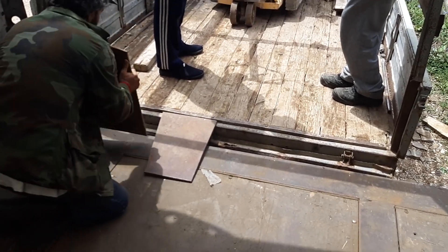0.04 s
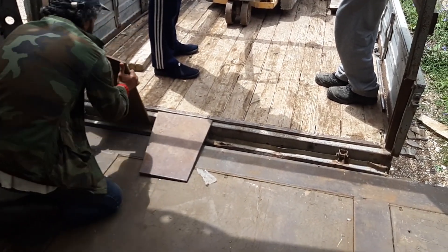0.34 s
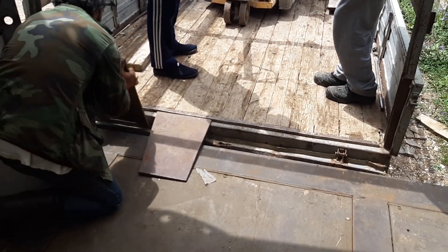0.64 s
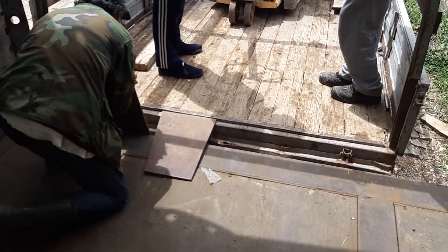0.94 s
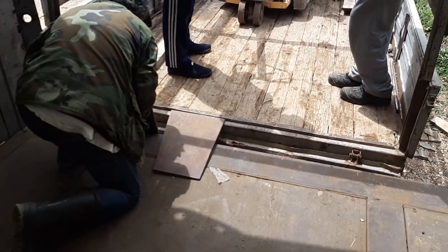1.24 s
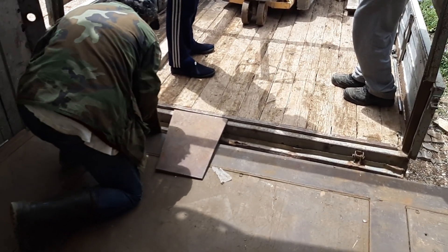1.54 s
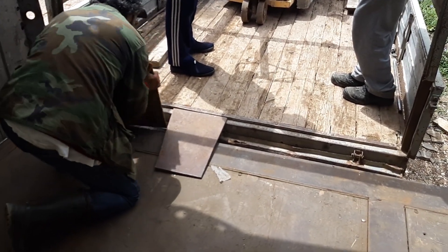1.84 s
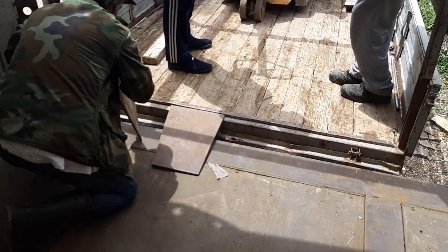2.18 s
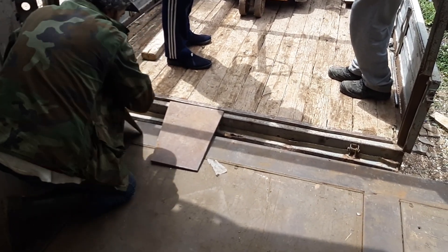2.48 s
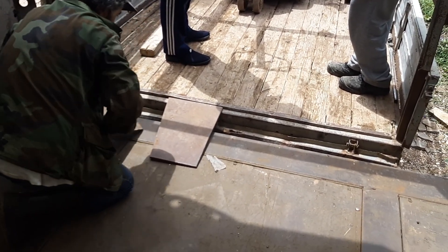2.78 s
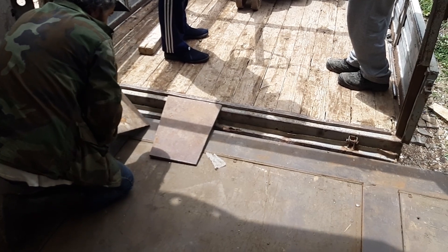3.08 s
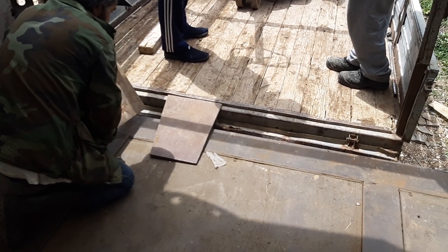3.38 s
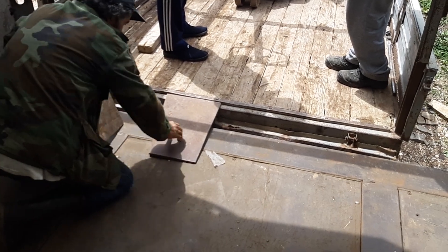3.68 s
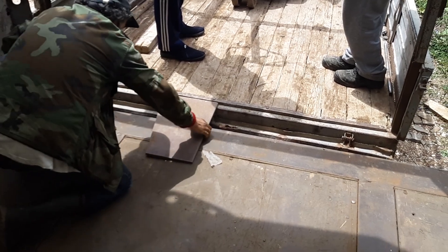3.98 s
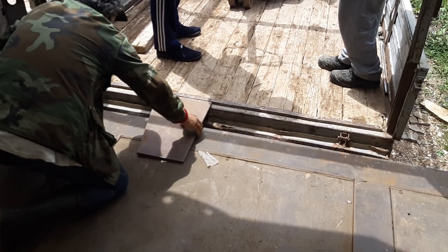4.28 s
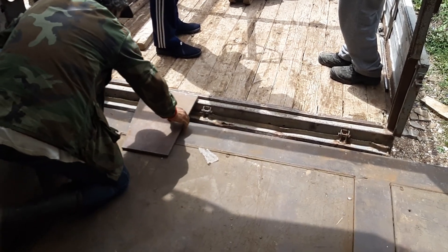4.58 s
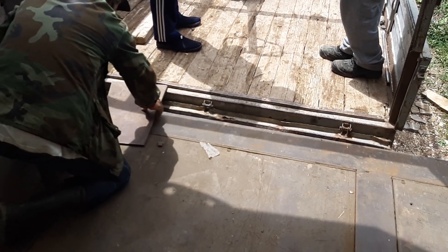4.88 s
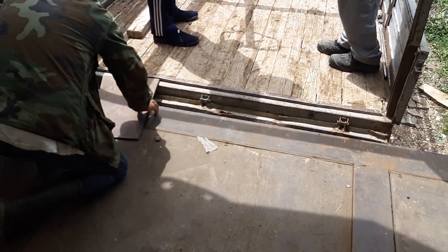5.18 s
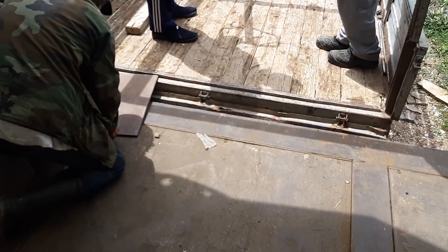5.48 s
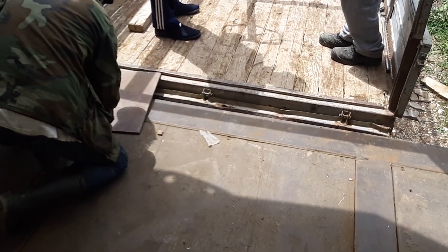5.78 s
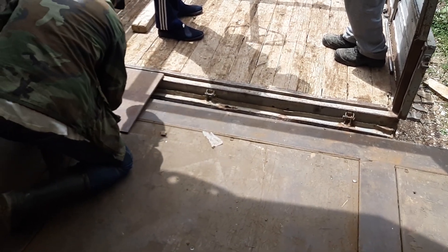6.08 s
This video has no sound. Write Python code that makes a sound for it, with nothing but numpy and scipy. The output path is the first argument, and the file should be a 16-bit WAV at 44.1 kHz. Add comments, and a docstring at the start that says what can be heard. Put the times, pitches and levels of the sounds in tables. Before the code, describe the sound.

Short gritty scrapes and echoing clanks of flat steel plates being shifted around inside a metal cargo box.

```python
"""A kneeling man works a flat steel plate along the floor of a steel cargo box, in still outdoor air.
First come scrapes and knocks: the edge grinds over grit, and each blow rings plate and floor and
echoes in the box. Near 1.8 s and 3 s the edge sticks and slips, so the floor groans. He sets the plate
down and drags a second one over the sill, with a run of ringing clangs from 3.6 to 4 s.
More scrapes and knocks follow, the last just after 6 s."""
import sys
import numpy as np
from scipy import signal
from scipy.fft import rfft, irfft, next_fast_len
from scipy.io import wavfile

SR = 44100
rng = np.random.default_rng(int(sys.argv[2]) if len(sys.argv) > 2 else 0)


def int16_out(signal):
    """Quantize to a 16-bit WAV file."""
    q = np.round(np.clip(np.atleast_2d(signal).T, -1, 1) * 32767)
    wavfile.write(sys.argv[1], SR, q.astype(np.int16))


N = 270316
RING_S, ATTACK_S = 1.2, 0.033   # length of one ring, and the opening part that sets its level

# Steel hitting steel. Thud and clang are counted from the strength; more dullness means less treble.
# (time [s], relative strength [dB], thud [dB], clang [dB], dullness [dB per octave], plate ring [dB],
#  clatter fade time [s])
HITS = [(0.566, -27, -24, 2.5, 11.5, -2.5, 0.68), (0.64, -28, -11.5, -12, 6.5, -13, 0.11),
        (0.745, -18.5, -16, -2, 6.5, -18.5, 0.63), (0.767, -26.5, 6, 2.5, 1.5, -6, 0.32),
        (0.984, -12, -18.5, 0, 12, 0.5, 0.54), (1.199, -26.5, -23, -22, 2.5, -6, 0.21),
        (1.25, -24.5, -42, -4.5, 9, -8, 0.15), (1.853, -45.5, -27, 4.5, 9.5, 6, 0.52),
        (2.201, -30.5, -9, 9, 8.5, -7.5, .12), (2.21, -17.5, -4.5, -5, 7.5, -12, 0.32),
        (2.295, -31, 1.5, -4, 7.5, -15, 0.34), (2.797, -44.5, -10, 0, 4, 1, 0.49),
        (3.113, -40, -15, -9, 6.5, -7, 0.56), (3.135, -47.5, -15.5, 8, 10, 11, 0.44),
        (3.579, -18.5, -3, -4, 4.5, 0.5, 0.72), (3.677, -17.5, -5, -1, 4.5, 1.5, 0.74),
        (3.733, -24, 6, 4, 9, 5, 1), (3.836, -14.5, -7, 0.5, 3, 12, 0.71),
        (3.872, -15, -16.5, 4.5, 6.5, 11.5, 0.81), (3.945, -22.5, -10, 2.5, 4.5, 27.5, 0.75),
        (3.972, -14, -25.5, -3.5, 8, -6.5, .31), (4.471, -47, 4, 2.5, -2, -8, 0.3),
        (4.496, -24, -6.5, -4, 3.5, -10.5, 0.27), (4.653, -40.5, 0, -26, 25, 19, .19),
        (4.798, -29.5, -9.5, 3, 5.5, -9, 0.23), (4.867, -31, -12.5, -5.5, 1.5, -21, 0.35),
        (5.51, -30.5, -11, -13, 5, 0, 0.23), (5.535, -37, -15, -2, 3, 1, .55),
        (6.021, -16.5, -14.5, 1.5, 7, 3, 0.21), (6.087, -37, -12, 14, 12, 16, 0.16)]
# When the plate lying over the sill rings rather than the held one: (start [s], end [s])
SILL_TIMES = [(0.7, 1.4), (3.5, 5.0)]
def blows(steel, swell_s=0.0033, crack_db=-5.5, full_ring_db=14.5, edge_octaves=1.22, grit_octaves=3.03):
    """Each blow swells as the edge settles, cracks and dies away; a blunter blow has less treble."""
    out = np.zeros((2, N))
    t = np.arange(round(RING_S * SR)) / SR
    attack = (1 - np.exp(-t / swell_s)) * (1 + from_db(crack_db) * fade(t, 0.058))
    for start, strength_db, thud_db, clang_db, dullness, ring_db, t60 in HITS:
        on_sill = any(begin < start < end for begin, end in SILL_TIMES)
        free_db = min(ring_db - full_ring_db, 0)   # a freer plate keeps more of its ring
        bands = struck_steel(steel, sill_share=0.97 if on_sill else 0.05, clatter_t60=t60,
                             plate_db=ring_db, floor_db=-6.5, damping_t60=1.84 * t60, free_db=free_db)
        edge_db = clang_db - dullness * edge_octaves
        grit_db = clang_db - dullness * grit_octaves
        for db, band in zip([thud_db, 0, clang_db, edge_db, grit_db], bands):
            hit = band * attack
            add(out, hit * from_db(strength_db + db) / attack_rms(hit), start)
    return out


# The notes (modes) of the plate over the sill, the plate in his hands and the steel floor.
# Each table: (pitch [Hz], relative level [dB], fade time [s])
SILL_PLATE_NOTES = [(1120, -15, 0.5), (1238, -12, 0.65), (1394, -3, 0.85), (1540, -4, 0.65),
                    (1701, -7, 0.85), (1890, 2, 1.0), (2056, 0, 0.85), (2094, -15, 0.78), (2347, 1, 0.48),
                    (2503, -10, 0.72), (2751, -8, 0.55), (2842, -3, 0.72), (2891, -20, 0.68),
                    (2977, -22, 0.67), (3607, -7, 0.55), (3682, -7, 0.68), (4506, -23, 0.56),
                    (4683, -14, 0.55), (5006, -28, 0.53), (5286, -27, 0.52), (5367, -28, 0.51),
                    (5809, -13, 0.48), (6158, -24, 0.48), (6347, -27, 0.48), (6864, -33, 0.46),
                    (7041, -32, 0.45), (7095, -35, 0.45), (8285, -36, 0.42), (11084, -36, 0.37),
                    (11536, -40, 0.36)]
HELD_PLATE_NOTES = [(1126, -3, .35), (1238, -8, 1.1), (1292, -3, .3), (1542, -7, 1.0), (1884, -1, .85),
                    (1912, 1, .25), (2030, -3, .3), (2363, -6, .6), (2530, -5, .35), (2885, -6, .8),
                    (2977, -12, .8), (3836, -2, .6), (4690, -8, .7), (5006, -18, .5), (5785, -16, .45),
                    (6352, -17, .35), (6589, -13, .35)]
FLOOR_NOTES = [(109.5, -4.5, 0.55), (147.8, 4.5, 0.79), (250.7, -4, 0.31), (279.8, 7.5, 0.36),
               (339.8, 6, 0.74), (437.7, 3, 0.72), (494.2, 0.5, 0.42), (653, -19, 0.35), (616, 7, 0.78),
               (866, 2, 0.5), (904, 0.5, 1)]
def steel_notes():
    """Bending steel rings at its own notes: yield each part's pitches and fading sine and cosine waves."""
    t = np.arange(round(RING_S * SR)) / SR
    for notes in (SILL_PLATE_NOTES, HELD_PLATE_NOTES, overtones(), FLOOR_NOTES):
        hz, db, t60 = np.transpose(notes)
        angle = 2 * np.pi * hz[:, None] * t
        decay = from_db(db)[:, None] * fade(t, t60[:, None])
        yield hz, np.vstack([np.sin(angle) * decay, np.cos(angle) * decay]).astype(np.float32)


def ringing(part, spread_db=1.65):
    """Steel struck at a random spot: each note gets its own strength, and its own phase at each ear."""
    hz, waves = part
    strength = from_db(spread_db * rng.standard_normal(len(hz)))
    ear_gap = np.arccos(at_hz(EAR_LIKENESS, hz)) * (-1) ** np.arange(len(hz))
    phase = rng.uniform(0, 2 * np.pi, len(hz)) + ear_gap * [[0], [1]]
    ring = np.hstack([strength * np.cos(phase), strength * np.sin(phase)]).astype(np.float32) @ waves
    return ring / attack_rms(ring)


# The many weak notes of floor and walls, blurred into noise: (frequency [Hz], relative level [dB])
CLATTER_TONE = [(26, -58.5), (45, -20), (112, -11.5), (139, -8), (187, -7), (391, -5.5), (539, -7),
                (1020, -9), (1300, -11), (1480, -8), (5040, -17), (5430, -18.5), (7650, -29.5),
                (9550, -35.5), (16000, -45.5)]
# The echo of the box, one row for each band from thud to grit: (relative level [dB], fade time [s])
BOX_ECHO = [(-15.5, 0.93), (-13.5, 0.87), (-3, 0.65), (-10, 0.84), (-14.5, 0.91)]
def struck_steel(steel, sill_share, clatter_t60, plate_db, floor_db, damping_t60, free_db):
    """One touch gives a quick clatter, the echo of the box and clear notes, split into five bands."""
    t = np.arange(round(RING_S * SR)) / SR
    clatter = stereo_noise(CLATTER_TONE, len(t))
    sill, held, high, floor = (ringing(part) for part in steel)
    plates = np.sqrt(sill_share) * sill + np.sqrt(1 - sill_share) * held + from_db(-19) * high
    # Hands and floor soak up the ring, except for the share that stays free.
    damping = np.hypot(fade(t, damping_t60), from_db(free_db))
    notes = (from_db(plate_db) * plates + from_db(floor_db) * floor) * damping
    bands = []
    for index, (echo_db, echo_t60) in enumerate(BOX_ECHO):
        decay = np.hypot(fade(t, clatter_t60), from_db(echo_db) * fade(t, echo_t60))
        bands.append(one_band(clatter * decay + notes, index))
    return bands


def overtones(count=80, t60_at_3khz=0.81):
    """A plate's high notes are about evenly spaced, and the higher ones die sooner."""
    hz = np.linspace(2600, 15000, count) + rng.uniform(-70, 70, count)
    db = at_hz(CLATTER_TONE, hz) + rng.normal(0, 1, count)
    return np.column_stack([hz, db, t60_at_3khz * np.sqrt(3000 / hz)])


# Pushes of the edge along the floor:
# (start [s], length [s], relative level [dB], growth over the push [dB], bite into grit [dB])
PUSHES = [(0.286, 0.048, -74, -3, 19), (0.448, .09, -68.5, 0, 11), (0.605, 0.089, -24, -9, -6),
          (0.757, 0.059, -24.5, -1, 8), (0.87, 0.11, -32, -6, 0), (1.191, 0.078, -26.5, -0.5, -8),
          (1.3, .07, -43, 4, -13), (1.678, .15, -51, 2, -1), (1.824, 0.042, -46, 9, 2.5),
          (1.924, .11, -61, 4.5, 9.5), (2.269, 0.067, -29.5, -5, -5.5), (2.36, 0.059, -38, -2, -8),
          (2.775, .175, -38, 4, -0.5), (2.965, 0.18, -48, 9.5, 0), (3.44, .13, -66, 0.5, 10.5),
          (4.257, 0.21, -43, 9, 4.5), (4.556, 0.22, -39.5, 15, 3), (4.803, .04, -33, 2, 2),
          (4.897, 0.078, -35, -5, -13), (5.004, 0.071, -51, 0.5, -1), (5.436, 0.059, -41.5, 12.5, 0.5),
          (5.544, 0.14, -42, -10, -9.5), (5.697, .12, -54.5, 10, 1.5), (5.824, 0.18, -33, 10.5, 1.5),
          (6.064, .07, -37, 3, 0)]
# A scrape's tone, one row for each band: (relative level [dB], gain from bite [dB per dB])
SCRAPE_TONE = [(-8.5, 0), (-0.5, 0), (-8.5, 0.9), (-7.5, 1), (-16.5, 1.37)]
def scraping(steel):
    """Tiny slips shake the steel. Pressed down, the plate hardly rings; more bite gives more treble."""
    pushes = np.array([push(*shape) for *shape, _ in PUSHES])
    bite_db = np.array(PUSHES)[:, -1]
    force = slips()
    bands = struck_steel(steel, sill_share=0.45, clatter_t60=0.15,
                         plate_db=-8, floor_db=-8, damping_t60=0.13, free_db=-17)
    out = np.zeros((2, N))
    for (db, bite_gain), band in zip(SCRAPE_TONE, bands):
        pressure = from_db(db + bite_gain * bite_db) @ pushes
        one_slip = band / np.sqrt(np.sum(band ** 2) / 2)
        out += signal.fftconvolve((force * pressure)[None], one_slip, axes=1)[:, :N]
    return out


def slips(per_s=1300, spread_db=3.5, rough_db=2.5, rough_hz=70.96):
    """The edge slips over rust and grit in tiny kicks of uneven size, stronger in bunches."""
    sizes = from_db(spread_db * np.minimum(rng.exponential(1, N), 4)) * rng.choice([-1, 1], N)
    slipping = rng.random(N) < per_s / SR
    kicks = sizes * slipping * from_db(rough_db * wander(rough_hz))
    return kicks / rms(kicks)


def push(start, length, level_db, growth_db, grip_s=0.016, let_go_s=0.025):
    """The loudness of one push: the edge grips, the pressure grows or eases, the edge lets go."""
    t = np.arange(N) / SR - start
    contact = np.clip(np.minimum(t / grip_s, 1 + (length - t) / let_go_s), 0, 1)
    touching = contact > 0
    progress = np.minimum(t[touching] / length, 1)
    contact[touching] *= from_db(level_db + growth_db * (progress - 0.5))
    return contact


# Groans from the dragged edge: (start [s], length [s], level [dB], growth [dB], pitch [Hz])
GROANS = [(1.739, .06, -48, 5, 380), (1.83, 0.027, -41, 14, 355.4), (2.798, 0.15, -37.5, 7, 322),
          (2.972, 0.17, -39, -2, 337.6), (3.112, 0.054, -31, -14, 339)]
def judder(pitch_waver=0.038, rough_db=-3.5):
    """The edge sticks and slips at a nearly steady rate, and the floor groans."""
    uneven_time = (np.arange(N) + np.cumsum(pitch_waver * wander(hz=79))) / SR
    groan = sum(push(*shape) * np.sin(2 * np.pi * hz * uneven_time) for *shape, hz in GROANS)
    return groan * from_db(rough_db * wander(hz=39.55))


# The tone of still outdoor air: (frequency [Hz], relative level [dB])
AIR_TONE = [(18, -31), (30, -5), (252, -15.5), (740, -9), (1320, -13), (2410, -15), (2610, -18),
            (2830, -18.5), (3400, -13), (9970, -20.5), (16000, -38.5)]
def outdoor_air(level_db=-68.5):
    """The air is a faint, steady hush behind everything."""
    return from_db(level_db) * stereo_noise(AIR_TONE, N)


# How alike the two ears hear a sound: (frequency [Hz], likeness [1 = the same, 0 = unrelated])
EAR_LIKENESS = [(60, 1), (150, 0.98), (350, 0.96), (700, 0.46), (1400, -0.14), (3000, -0.11), (12000, 0.08)]
def stereo_noise(tone, size):
    """Noise with the given tone and an average level of 1, alike at both ears only in the bass."""
    padded = next_fast_len(size)
    hz = np.fft.rfftfreq(padded, 1 / SR)
    mid, side = rfft(rng.standard_normal((2, padded)))
    alike = at_hz(EAR_LIKENESS, hz)
    ears = np.sqrt(1 + alike) * mid + np.sqrt(1 - alike) * side * [[1], [-1]]
    noise = irfft(ears * from_db(at_hz(tone, hz)), padded)[:, :size]
    return noise / rms(noise)


# The five bands of the steel's sound, named thud, body, clang, edge and grit: (low [Hz], high [Hz])
BANDS = [(45, 250), (250, 1000), (1000, 2620), (2620, 7000), (7000, 15900)]
# Which way each band leans: (left level minus right level [dB])
LEAN_DB = [0, -0.5, -1, -0.5, -1.3]
def one_band(sound, index):
    """Keep one band of a stereo sound and set its left-right balance."""
    band = signal.sosfilt(signal.butter(4, BANDS[index], "band", fs=SR, output="sos"), sound)
    return band * from_db(np.array([[1], [-1]]) * LEAN_DB[index] / 2)


def from_db(db):
    """Turn decibels into a number to multiply by."""
    return 10 ** (np.asarray(db) / 20)


def rms(sound):
    """The average level of a sound (root mean square)."""
    return np.sqrt(np.mean(sound ** 2) + 1e-20)


def attack_rms(sound):
    """The average level of a sound's opening moment."""
    return rms(sound[:, :round(ATTACK_S * SR)])


def fade(t, t60):
    """Die away by 60 dB in t60 seconds, the fade time."""
    return np.exp(-np.log(1000) * t / t60)


def at_hz(points, hz):
    """Read between a table's rows, giving every octave the same width."""
    row_hz, value = np.transpose(points)
    return np.interp(np.log(hz + 0.0012), np.log(row_hz), value)


def wander(hz):
    """A random drift, about 1 in size, that heads for a new value hz times a second."""
    targets = rng.standard_normal(4096)
    return np.interp(np.arange(N) * hz / SR, np.arange(len(targets)), targets) / np.sqrt(2 / 3)


def add(out, sound, start_s):
    """Mix a sound in at its start time."""
    i = round(start_s * SR)
    out[:, i:i + sound.shape[1]] += sound[:, :N - i]


def scene():
    """Blows, scraping and judder over quiet air."""
    steel = list(steel_notes())
    return from_db(-2) * blows(steel) + scraping(steel) + judder() + outdoor_air()


def record(dry, dip_hz=7900, dip_depth=0.5, cutoff_hz=15900):
    """The microphone softens the sound near 8 kHz, clips the peaks and cuts the highest treble."""
    dip_b, dip_a = signal.iirpeak(dip_hz, Q=4, fs=SR)
    softened = dry - dip_depth * signal.lfilter(dip_b, dip_a, dry)
    treble_cut = signal.ellip(10, 0.1, 80, cutoff_hz, fs=SR, output="sos")
    return signal.sosfilt(treble_cut, np.clip(softened, -1, 1))


dry = scene()
out = record(dry)
int16_out(out)
```